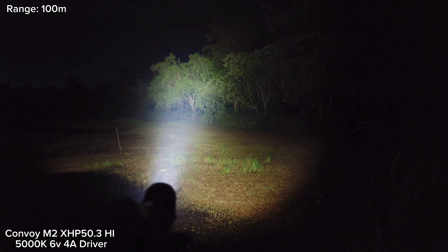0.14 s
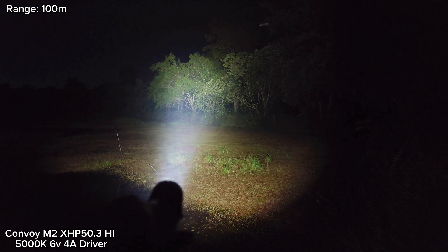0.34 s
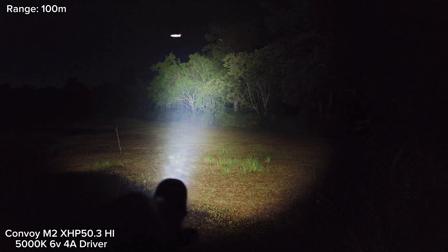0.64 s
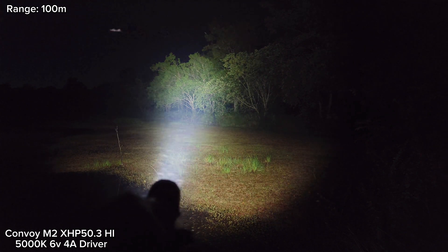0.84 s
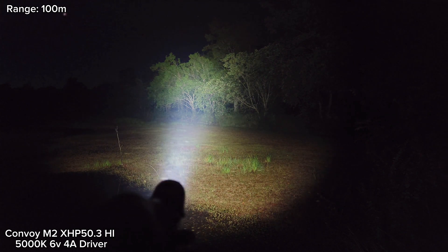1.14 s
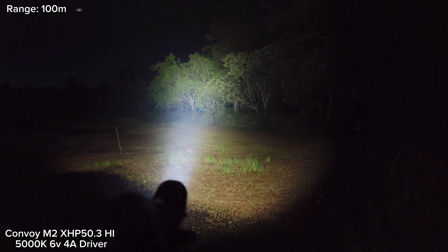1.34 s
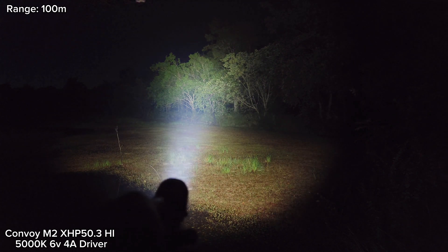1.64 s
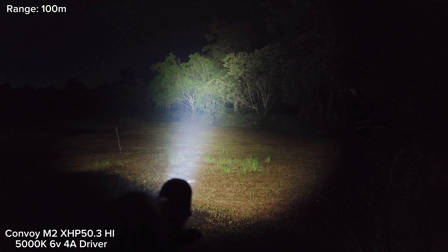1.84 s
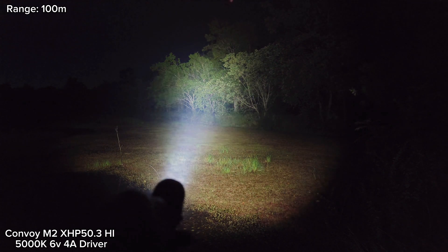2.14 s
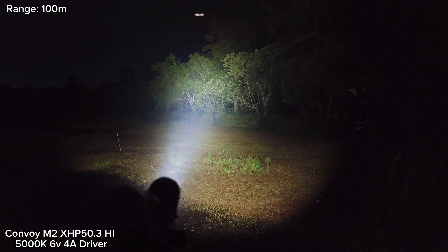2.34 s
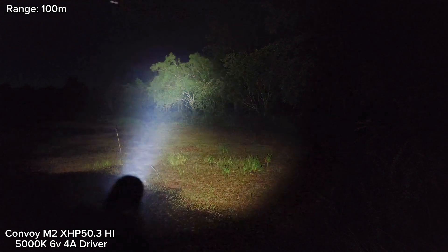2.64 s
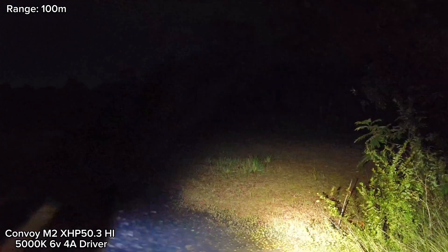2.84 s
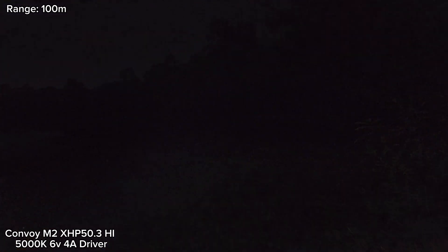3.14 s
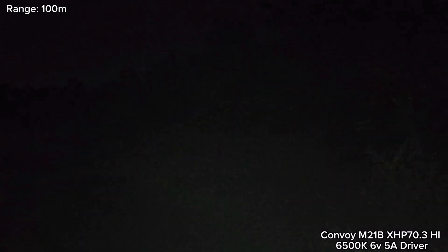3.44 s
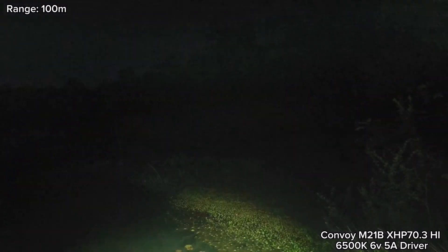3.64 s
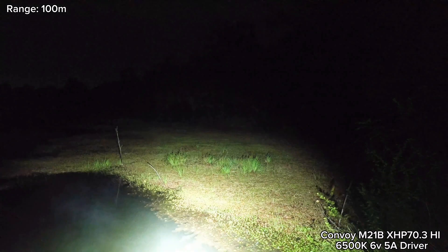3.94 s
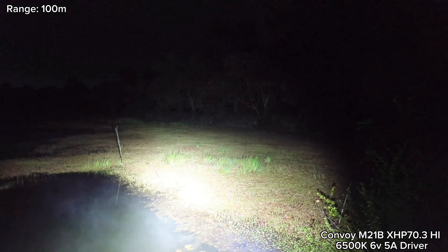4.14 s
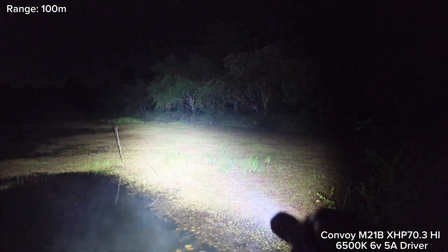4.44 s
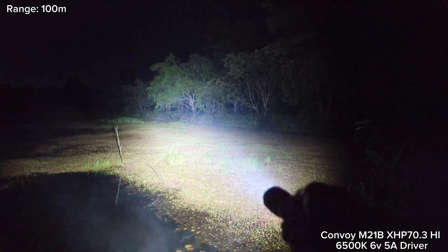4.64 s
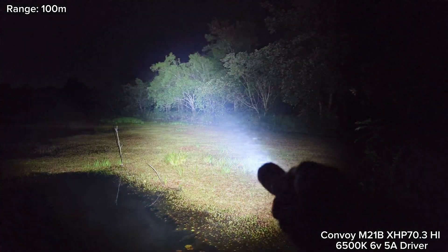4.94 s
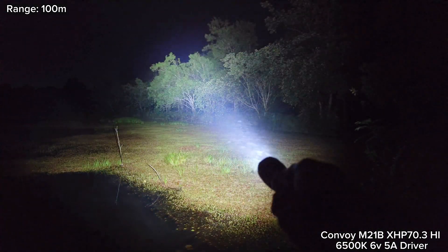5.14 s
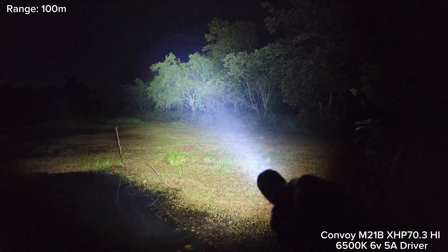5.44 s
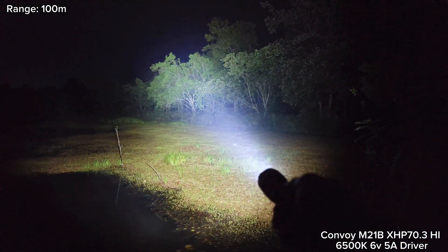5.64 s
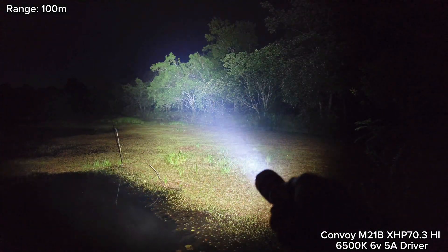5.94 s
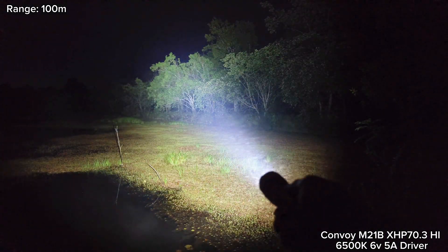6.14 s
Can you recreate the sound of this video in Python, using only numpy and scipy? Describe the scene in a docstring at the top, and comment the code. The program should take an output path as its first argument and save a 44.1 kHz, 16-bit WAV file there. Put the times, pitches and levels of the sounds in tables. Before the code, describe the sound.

A dense night chorus fills a marshy field edged by trees, heard in wide stereo with short diffuse tails. Throughout, far frogs rattle in a churning mass of rapid pulsed croaks, some around 1.3 kHz, brighter ones near 3 kHz. Closer croaks stand out several times a second, leaning left. On the right a tiny frog whistles falling triplets near 5 kHz about five times a second, over a blurred distant peeping chorus; a lower neighbour answers around 2.9-3.3 and 5.6-5.9. Bush-cricket buzzes near 7.3 kHz swell at 0-0.3, 0.75-1.5 and 1.9-2.75, then more faintly at 3.4-4.4, 4.7-5.6 and 5.9 onward. Grass hiss stays steady, with thin high rasps. The frogs ease near 3; a very faint squeak at 3.13 and a soft dull tick with a momentary dip at 3.19 follow. Near croaks then strengthen. A faint hoot comes at 4.5; low traffic rumble surges slightly at 5.55.

```python
"""A crowd of frogs rattles in a marshy field at night, some nearer: larynx pulses ring throat and vocal sac.
A small frog whistles triplets of falling peeps, with an answering neighbour and a far blurred chorus.
A bush cricket buzzes in swells from wing strokes; grass insects hiss and rasp as pulsed, coloured noise.
Far traffic is low noise with an engine note; a hoot and a squeak are bent tones, and a tick is a decaying step.
Grass and trees scatter the frogs, cricket, hoot and squeak as diffuse tails."""
import sys
import numpy as np
from scipy import signal
from scipy.fft import rfft, irfft, next_fast_len
from scipy.io import wavfile
from scipy.ndimage import uniform_filter1d

SR = 44100
rng = np.random.default_rng(int(sys.argv[2]) if len(sys.argv) > 2 else 0)


def pcm_store(signal):
    """Save signal as 16-bit PCM."""
    levels = np.round(np.clip(np.atleast_2d(signal), -1, 1) * 32767)
    wavfile.write(sys.argv[1], SR, levels.astype(np.int16).T)


N = 277830
TIME = np.arange(N) / SR  # s


# throat resonances that a croak pulse rings: [f/Hz, relative level/dB]
THROAT_RESONANCES = [(470, -55.5), (800, -51), (993, -31.5), (1090, -15.5), (1210, -.5), (1310, 2),
                     (1380, -1), (1490, -8.5), (2060, -14.5), (2300, -19.5), (2990, -30), (5060, -120)]
# vocal sac resonances of the far frogs: [f/Hz, relative level/dB]
FAR_SAC_RESONANCES = [(1240, -54.5), (2100, -23.5), (2380, -16), (2690, -6), (2860, -0.5), (3010, 1.5),
                      (3260, -3.5), (3650, -9.5), (4130, -22), (4500, -20.5), (5850, -38.5), (9900, -120)]
# level of the deep far croaks, which sinks towards 3 s, then rises again: [t/s, level/dB before churn]
THROAT_CROWD_LEVEL = [(0, -30.5), (1.3, -31), (2.1, -31.5), (2.3, -33), (2.95, -33), (3.22, -34),
                      (3.4, -32.3), (4.1, -33.5), (6.3, -32.5)]
# level of the bright far croaks, which sinks towards 3 s, then rises again: [t/s, level/dB, left minus right/dB]
SAC_CROWD_LEVEL = [(0, -24.5, -1), (1.2, -24, 1.5), (2.1, -24.5, .5), (2.28, -25.5, 1), (2.6, -25.5, -0.5),
                   (2.75, -27.5, -2), (2.87, -26, 0), (3.13, -27, -0.5), (3.25, -24.7, 2), (4.1, -25, 1),
                   (6.3, -24.7, 3)]


def far_frogs(churn_db=0.83):
    """Two crowds: deeper croaks that carry by the throat, and brighter ones that carry by the sac."""
    throat_db, = curves(THROAT_CROWD_LEVEL)
    sac_db, pan_db = curves(SAC_CROWD_LEVEL)
    throats = crowd(THROAT_RESONANCES, count=5, calls_per_s=5.5, pulse_hz=92.03, length=.23,
                    wet_db=-1.2, size_spread=0.018)
    sacs = crowd(FAR_SAC_RESONANCES, count=11, calls_per_s=5.5, pulse_hz=94.07, length=.25,
                 wet_db=1.0, size_spread=0.026)
    deep_crowd = throats * undb(throat_db + churn_db * walk(30))
    bright_crowd = sacs * undb(sac_db) * pan(pan_db)
    return deep_crowd + bright_crowd


def crowd(body, count, calls_per_s, pulse_hz, length, wet_db, size_spread):
    """Each frog has its own place, size and tempo; together they make a churning rattle."""
    out = np.zeros((2, N))
    sizes = np.linspace(-1, 1, count)
    for size, (tempo, speed, place) in zip(sizes, rng.standard_normal((count, 3))):
        pulses = np.zeros(N)
        beats = np.cumsum(rng.uniform(.85, 1.15, size=52)) - rng.random() - 2
        starts = beats / (calls_per_s * np.exp(.13 * tempo))
        for s in starts[starts < N / SR]:
            add(pulses, s, croak(pulse_hz * np.exp(.03 * speed), length))
        voice = signal.oaconvolve(pulses, ring(body, 1 + size_spread * size))[:N]
        out += scatter(bearing(voice, 4 + 6 * place), wet_db, t60=0.24)
    return level(out)


def croak(pulse_hz, length, jitter=.03, uneven_db=1.34):
    """The larynx snaps open in a short, nearly even run of pulses that swells and fades."""
    chance = rng.standard_normal((32, 2))[:max(int(length * pulse_hz), 2)]
    count = len(chance)
    at = (np.cumsum(1 + jitter * chance[:, 0]) * SR / pulse_hz).astype(int)
    swell = np.sqrt(np.sin(np.pi * (np.arange(count) + .5) / count))
    pulses = np.zeros(at[-1] + at[0])
    pulses[at] = swell * undb(uneven_db * chance[:, 1])
    return level(pulses)


def ring(points, stretch, size=1024):
    """Causal unit-energy ring of a set of resonances; smaller animals stretch them upwards."""
    stretched = [(hz * stretch, db) for hz, db in points]
    # folding the cepstrum onto positive time gives minimum phase
    cepstrum = irfft(np.log(gains(stretched, size)))
    cepstrum[1:size // 2] *= 2
    cepstrum[size // 2 + 1:] = 0
    h = irfft(np.exp(rfft(cepstrum)))
    return h / np.linalg.norm(h)


# nasal resonance of the near deep croaks, above the throat: [f/Hz, relative level/dB]
NASAL_RESONANCES = [(900, -56), (1430, -15.5), (1650, -6), (1810, 7), (2030, -14.5), (2600, -7),
                    (5000, -68.5)]
# near deep croaks: [centre t/s, throat level/dB before trim, nasal level/dB before trim, left minus right/dB]
NEAR_DEEP_CROAKS = [(.07, -42, -51, 0), (0.169, -33, -49, -3), (.39, -35.5, -41, 2), (.59, -40, -46, -5),
                    (.69, -38.5, -44, 2), (.89, -40, -47, 3), (1.09, -36, -43, -2),
                    (1.43, -30.5, -37.5, 0.5), (1.641, -35, -40, -1), (1.78, -36.5, -40, 3),
                    (1.99, -38, -42, 3), (2.159, -34, -42, 3), (2.39, -37, -40.5, -3),
                    (2.57, -33.5, -52, 7), (2.7, -43, -41.5, -1), (2.809, -43, -48, -2),
                    (3.12, -38.5, -42.5, 2), (3.289, -36, -42, 4), (3.5, -50, -41, 4), (3.67, -37, -43, 12),
                    (3.809, -34.5, -42, 0), (3.95, -32.5, -55, 0), (4.14, -35, -37.5, 6),
                    (4.35, -33.5, -40, 2), (4.51, -33, -38, 8), (4.681, -33.5, -42, 5),
                    (4.89, -32.5, -41, -2), (5.06, -33, -40.5, 3.5), (5.2, -33.5, -39.5, 3),
                    (5.35, -35.5, -49, 3), (5.45, -34, -45, 5), (5.578, -42, -45, 9), (5.69, -33, -46, 3),
                    (5.83, -34.5, -42, 7), (6.02, -33.5, -46, 3), (6.11, -33.8, -41, 8),
                    (6.231, -33.5, -43, 2.5)]
# vocal sac resonances of a near frog tuned to NEAR_SAC_HZ: [f/Hz, relative level/dB]
NEAR_SAC_RESONANCES = [(1240, -60.5), (2100, -31), (2450, -20), (2780, -3), (3010, 4), (3250, -4.5),
                       (3650, -15.5), (4130, -31), (4500, -29), (5850, -35.5), (9900, -120)]
NEAR_SAC_HZ = 3000
# near bright croaks: [centre t/s, level/dB before trim, sac f/Hz, left minus right/dB]
NEAR_BRIGHT_CROAKS = [(.02, -27, 3130, -1), (.2, -27.5, 3000, 11), (.36, -28, 3040, 5), (.53, -29, 3010, 3),
                      (.75, -30, 3090, -1), (.92, -29.5, 2930, 1), (1.089, -30.5, 3040, -2),
                      (1.3, -36, 2980, 0), (1.461, -28, 3040, 1), (1.54, -34, 3000, 9),
                      (1.639, -31, 2990, 8), (1.82, -33, 2940, 11), (2.04, -33, 2970, -2),
                      (2.18, -28, 3190, 2), (2.43, -34, 2920, -3), (2.57, -30.5, 3140, 0),
                      (2.96, -32, 2970, 5), (3.34, -28, 2900, 9), (3.47, -29, 3090, -1),
                      (3.659, -27.5, 2970, 3), (3.88, -32, 3100, 1), (3.98, -27.7, 2980, 1),
                      (4.23, -27, 3260, 5), (4.36, -28.5, 2970, 1), (4.601, -26, 3170, 5),
                      (4.7, -31, 2980, 10), (4.82, -30, 3010, 6), (4.97, -33, 3130, 0),
                      (5.065, -26.5, 3000, 4), (5.22, -29, 3020, 5), (5.51, -31, 2950, -2),
                      (5.72, -26.5, 3070, 1), (5.86, -30, 3010, 9), (6.1, -26, 3000, 2),
                      (6.235, -26.7, 3000, 1)]


def near_frogs(pulse_hz=93, deep_length=.11, bright_length=.12, size_spread=0.018, speed_spread=0.029,
               deep_db=1.0, bright_db=-0.5):
    """Closer frogs stand out of the crowd, each croak with its own size and speed."""
    deep, bright = np.zeros((2, 2, N))

    def call(track, s, body, length, pan_db, uneven_db):
        """One croak through its resonances, its pulse run centred on time s."""
        speed = 1 + speed_spread * rng.normal()
        pulses = croak(pulse_hz * speed, length, jitter=.04, uneven_db=uneven_db)
        voice = signal.fftconvolve(pulses, body)
        add(track, s - len(pulses) / SR / 2, pan(pan_db) * bearing(voice, 4))

    for s, throat_db, nasal_db, pan_db in NEAR_DEEP_CROAKS:
        stretch = 1 + size_spread * rng.normal()
        throat = undb(throat_db) * ring(THROAT_RESONANCES, stretch)
        nose = undb(nasal_db) * ring(NASAL_RESONANCES, stretch)
        call(deep, s, throat + nose, deep_length, pan_db, uneven_db=1.4)
    for s, db, hz, pan_db in NEAR_BRIGHT_CROAKS:
        sac = undb(db) * ring(NEAR_SAC_RESONANCES, hz / NEAR_SAC_HZ)
        call(bright, s, sac, bright_length, pan_db, uneven_db=1.3)
    deep_field = undb(deep_db) * scatter(deep, wet_db=-0.2, t60=0.074)
    bright_field = undb(bright_db) * scatter(bright, wet_db=2.0, t60=0.064)
    return deep_field + bright_field


# triplets of the small frog: [first peep centre t/s, level/dB before trim and unevenness]
PEEPER_TRIPLETS = [(.096, -32.5), (.292, -33), (.487, -32.5), (.683, -33), (.917, -31), (1.114, -30.5),
                   (1.311, -32.5), (1.508, -33), (1.704, -32), (1.903, -31.5), (2.098, -36), (2.296, -31),
                   (2.532, -31), (2.69, -31), (2.963, -30.5), (3.163, -33), (3.365, -33.5), (3.524, -30.5),
                   (3.76, -30), (3.955, -31.5), (4.154, -29.5), (4.389, -32.5), (4.589, -32),
                   (4.785, -32.5), (4.983, -32), (5.179, -32.5), (5.374, -30), (5.573, -35), (5.768, -34),
                   (6.004, -36), (6.165, -34)]
# a slightly larger neighbour, lower in pitch: [first peep centre t/s, level/dB before trim and unevenness]
PEEPER_ANSWERS = [(2.872, -35), (2.955, -37), (3.045, -32), (3.335, -40), (5.615, -35), (5.69, -41),
                  (5.92, -33)]


def peeper(hz=5000, answer_hz=4740, db=-1.0):
    """A small frog on the right peeps in triplets; now and then a neighbour answers."""
    song = triplets(PEEPER_TRIPLETS, hz) + triplets(PEEPER_ANSWERS, answer_hz)
    return scatter(undb(db) * pan(-9.0) * song, wet_db=-4.5, t60=.12)


def far_peepers(count=10, hz=4900, spread_hz=230, late_s=.015, loose_s=.08, db=-41.2):
    """More of the same small frogs fall in loosely with its beat and blur together further off."""
    out = np.zeros((2, N))
    beats = np.r_[-.3, -.1, np.array(PEEPER_TRIPLETS)[:, 0]]
    for (place, lag), size in zip(rng.standard_normal((count, 2)), np.linspace(-1, 1, count)):
        times = beats + late_s + loose_s * (lag + .5 * rng.standard_normal(len(beats)))
        song = triplets([(s, 0) for s in times], hz + spread_hz * size, spread_hz=136)
        out += scatter(bearing(song, 4 + 4 * place), wet_db=3.0, t60=0.75)
    return level(out, db)


def triplets(rows, hz, note_gap=.0375, spread_hz=35, uneven_db=1.3):
    """Three falling peeps for each [t/s, level/dB] row, each a little off in pitch and level."""
    out = np.zeros(N)
    for s, db in rows:
        for k in range(3):
            note = peep(hz + spread_hz * rng.normal())
            gain = undb(db + uneven_db * rng.normal())
            add(out, s + k * note_gap - len(note) / SR / 2, gain * note)
    return out


def peep(hz, fall_hz_per_s=43000, length=0.0213):
    """A short whistle that slides down through its centre pitch."""
    t = np.arange(-length / 2, length / 2, 1 / SR)
    envelope = np.cos(np.pi * t / length) ** 2
    return envelope * np.sin(2 * np.pi * (hz * t - fall_hz_per_s * t ** 2 / 2))


# bush cricket swells: [start t/s, end t/s, full level/dB before unevenness, file tone f/Hz before the snap,
# mean wing stroke f/Hz, fade at each end/s]
CRICKET_BUZZES = [(-.55, 0.31, -35.5, 7290, 170, .02), (-.3, .72, -50, 7340, 170, .3),
                  (.74, 1.537, -36.5, 7287, 165, 0.018), (1.92, 2.757, -36, 7275, 167, 0.022),
                  (3.4, 4.41, -41.5, 7280, 190, .09), (4.72, 5.615, -42, 7200, 140, 0.064),
                  (5.9, 6.803, -42, 7320, 180, .02)]


def bush_cricket(rise_db=13.0, rise_share=0.77, stroke_sharpness=1.2, snap_hz=1500, snap_share=.11,
                 uneven_db=1.5):
    """Each wing stroke snaps the file over the scraper, fast at first; the buzz swells unevenly and holds."""
    out = np.zeros(N)
    waver, slip, scrape, force = walk(9.4), walk(80), walk(500), walk(60)
    for start, end, db, hz, stroke_hz, fade in CRICKET_BUZZES:
        on = (TIME > start) & (TIME < end)
        t = TIME[on]
        rise = rise_db * np.clip((t - start) / (end - start) / rise_share - 1, -1, 0)
        swell = undb(db + rise + uneven_db * force[on])
        gate = np.clip(np.minimum(t - start, end - t) / fade, 0, 1)
        # position within each wing stroke, 0 to 1
        stroke = np.cumsum(stroke_hz * (1 + 0.05 * waver[on] + 0.09 * slip[on])) / SR % 1
        pitch = hz + snap_hz * np.exp(-stroke / snap_share) + 52 * scrape[on]
        tone = np.sin(2 * np.pi * np.cumsum(pitch) / SR)
        out[on] += swell * gate * level(np.sin(np.pi * stroke) ** stroke_sharpness * tone)
    return scatter(bearing(out, 1), wet_db=-7.0, t60=0.054)


# colour of the hiss in the grass: [f/Hz, relative level/dB]
GRASS_HISS_COLOUR = [(4000, -18.5), (5600, -2), (6700, 3.5), (7700, 2.5), (8300, 3.5), (8850, 4), (9300, 2),
                     (10200, 5.5), (10950, 0.5), (11400, -44), (15500, -12.5)]
# bouts of a thinner, higher insect: [start t/s, end t/s, level/dB]
RASP_BOUTS = [(-.1, 0.438, -52), (1.07, 1.416, -49), (1.941, 2.27, -53), (2.89, 3.186, -49.5),
              (3.78, 4.15, -56), (4.5, 5.02, -59), (5.3, 5.85, -56), (6.1, 6.4, -63)]
GRASS_DB, GRASS_PAN_DB = -42.5, -5.5  # mean hiss level; left minus right of its top


def grass_insects():
    """A steady hiss whose top comes mostly from the right, and short high rasps slightly left."""
    hiss = stridulation(GRASS_HISS_COLOUR, stroke_hz=128.2, depth=0.07) * undb(.5 * walk(24.95))
    top = colour(hiss, [(7000, -45), (7900, -2.5)])
    bed = (hiss - top + top * pan(GRASS_PAN_DB)) * undb(GRASS_DB + 0.093 * walk(3.69))
    bouts = np.zeros(N)
    for start, end, db in RASP_BOUTS:
        bouts += undb(db) * np.clip(np.minimum(TIME - start, end - TIME) / 0.017, 0, 1)
    rasp_colour = [(9000, -38), (9800, 1), (10300, -1), (10800, -11), (11400, -54)]
    rasp = stridulation(rasp_colour, stroke_hz=108.5, depth=0.56)
    return bed + pan(1.4) * bouts * rasp


def stridulation(points, stroke_hz, depth):
    """Scraping noise that comes in wing strokes."""
    stroke_rate = stroke_hz * (1 + 0.0524 * walk(5.2))
    strokes = 1 + depth * np.sin(2 * np.pi * np.cumsum(stroke_rate) / SR)
    return level(colour(rng.standard_normal((2, N)), points) * strokes)


# two notes of the hoot: [centre t/s, f/Hz at the peak, swell half-width/s, level/dB]
HOOT_NOTES = [(4.482, 709, .034, -54.5), (4.56, 690, .032, -66)]
SQUEAK_S = 3.135


def lone_calls(squeak_db=-54):
    """One faint far hoot on the right that trails off lower, and one very high squeak."""
    hoot = np.zeros(N)
    for s, hz, length, db in HOOT_NOTES:
        hoot += undb(db) * arch(s, hz, length, bend=.008, rough=.006)
    squeak = undb(squeak_db) * arch(SQUEAK_S, hz=12800, length=0.045, bend=.025, rough=0.013)
    return pan(-8) * scatter(hoot, wet_db=-6, t60=.4) + scatter(squeak, wet_db=-3, t60=.1)


def arch(s, hz, length, bend, rough):
    """A wavering note that rises to its pitch and sinks again as it fades."""
    away = ((TIME - s) / length) ** 2
    pitch = hz * (1 - bend * np.minimum(away, 2) + rough * walk(150))
    return np.exp(-away) * np.sin(2 * np.pi * np.cumsum(pitch) / SR)


TICK_S = 3.1845


def tick(db=-35, decay=0.0017):
    """A soft, dull tick: a step that decays within milliseconds."""
    return undb(db) * (TIME >= TICK_S) * np.exp(-np.abs(TIME - TICK_S) / decay)


# colour of the far traffic rumble: [f/Hz, relative level/dB]
TRAFFIC_COLOUR = [(20, -31), (38, -10.5), (60, -1), (105, 3), (160, -7.5), (245, -12), (340, -26.5),
                  (500, -34), (800, -66), (2000, -77)]
# the drone of one far engine, an octave above its firing note: [t/s, level/dB]
ENGINE_DRONE = [(0.0, -56.5), (1.54, -48), (1.74, -65), (1.9, -50), (1.93, -58), (3.47, -50.5), (4.07, -65),
                (4.14, -54), (5.09, -45.5), (5.6, -56), (6.21, -49.5), (6.3, -53)]
SURGE_S = 5.55


def traffic(firing_hz=67.8):
    """A low noise rumble and the wavering note of one engine, with a single low surge."""
    rumble = level(colour(rng.standard_normal((2, N)), TRAFFIC_COLOUR), -45.0)
    phase = 2 * np.pi * np.cumsum(firing_hz * (1 + 0.00598 * walk(3.09))) / SR
    drone_db, = curves(ENGINE_DRONE)
    drone = level(np.sin(2 * phase)) * undb(drone_db)
    firing = level(np.sin(phase) * undb(0.83 * walk(5.1)), -56.0)
    surge = undb(-42.5) * arch(SURGE_S, hz=100, length=0.11, bend=.01, rough=0.032)
    return rumble + surge + drone + firing


def scatter(x, wet_db, t60):
    """Send a sound across the field, where grass and trees scatter it."""
    return signal.oaconvolve(np.broadcast_to(x, (2, N)), echoes(wet_db, t60), axes=1)[:, :N]


def echoes(wet_db, t60, size=8820):
    """What reaches each ear from one spot: the direct sound, then a diffuse tail from grass and trees."""
    tail = rng.standard_normal((2, size)) * np.exp(-np.log(1000) * np.arange(size) / SR / t60)
    tail *= undb(wet_db) / np.linalg.norm(tail, axis=1, keepdims=True)
    tail[:, 0] += 1
    return tail / np.hypot(1, undb(wet_db))


def bearing(x, lag):
    """A direction: the sound reaches the left ear earlier and the right ear later by lag samples."""
    return np.array([np.roll(x, -int(lag)), np.roll(x, int(lag))])


def pan(db):
    """Left and right gains for a level difference, at constant power."""
    pair = undb(np.array([[.5], [-.5]]) * db)
    return pair / np.sqrt(np.mean(pair ** 2, axis=0))


def undb(db):
    """Decibels to gain."""
    return 10 ** (np.asarray(db) / 20)


def level(x, db=0):
    """Scale to an rms level."""
    return x * undb(db) / np.sqrt(np.mean(x ** 2))


def curves(table):
    """Each column of a timed table, sample by sample."""
    s, *columns = np.transpose(table)
    return [np.interp(TIME, s, c) for c in columns]


def gains(points, size):
    """Gain of an [f/Hz, level/dB] colour on the bins of a transform."""
    hz, db = np.transpose(points)
    bin_hz = np.arange(size // 2 + 1) * SR / size
    return undb(np.interp(np.log(bin_hz + 1), np.log(hz), db))


def colour(x, points):
    """Filter by an [f/Hz, level/dB] colour."""
    size = next_fast_len(N)
    return irfft(rfft(x, size) * gains(points, size), size)[..., :N]


def walk(rate):
    """Smoothed chance with a spread near 1, drawn afresh about rate times per second."""
    k = int(SR / rate)
    steps = np.repeat(rng.standard_normal(N // k + 2), k)
    return level(uniform_filter1d(uniform_filter1d(steps, k), k)[:N])


def add(track, s, sound):
    """Mix a sound into a track from time s on."""
    i = int(s * SR)
    a, b = max(i, 0), min(i + sound.shape[-1], N)
    if b > a:
        track[..., a:b] += sound[..., a - i:b - i]


def scene():
    """Sum of the frogs, insects, lone calls and traffic, with one soft tick."""
    frogs = far_frogs() + near_frogs() + peeper() + far_peepers()
    return frogs + bush_cricket() + grass_insects() + lone_calls() + tick() + traffic()


# how the microphone narrows the bass and widens the midrange: [f/Hz, side level/dB]
STEREO_WIDTH = [(40, -17), (130, -9), (260, -2), (600, 9), (1300, 4), (3000, 1), (6000, 0.5), (12000, 0)]
DIP_S, DIP_LENGTH_S, DIP_DB = 3.189, 0.0068, -19  # a brief dip of the level, centred just after the tick
TOP_HZ = 15750


def record(dry):
    """The microphone widens the midrange and cuts the top; the level dips briefly once."""
    mid = (dry[0] + dry[1]) / 2
    side = colour((dry[0] - dry[1]) / 2, STEREO_WIDTH)
    dip = undb(DIP_DB * np.exp(-(2 * (TIME - DIP_S) / DIP_LENGTH_S) ** 4))
    lowpass = signal.ellip(8, .2, 70, TOP_HZ, fs=SR, output="sos")
    return signal.sosfilt(lowpass, np.array([mid + side, mid - side]) * dip)


dry = scene()
out = record(dry)
pcm_store(out)
```